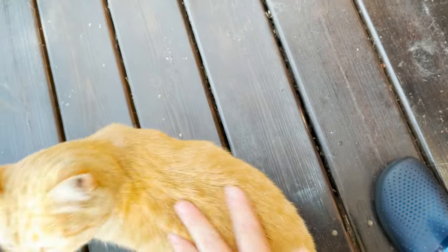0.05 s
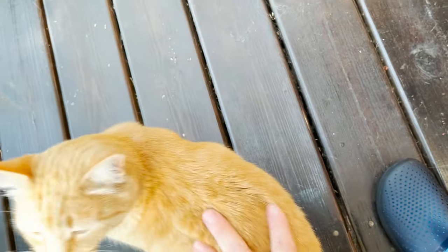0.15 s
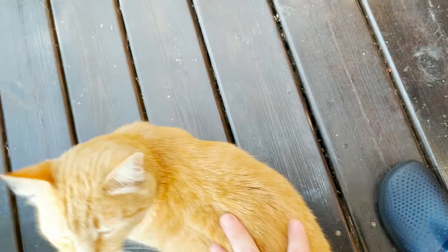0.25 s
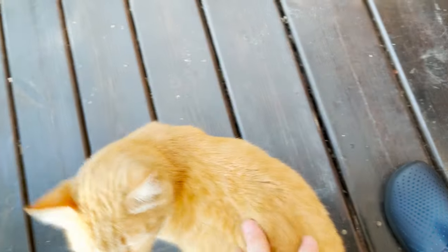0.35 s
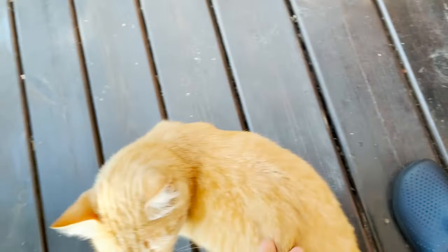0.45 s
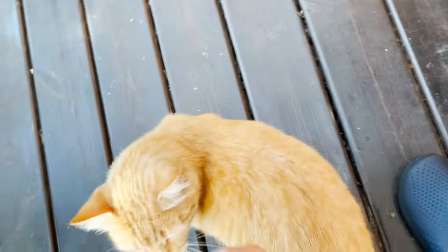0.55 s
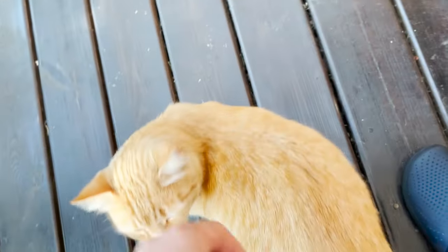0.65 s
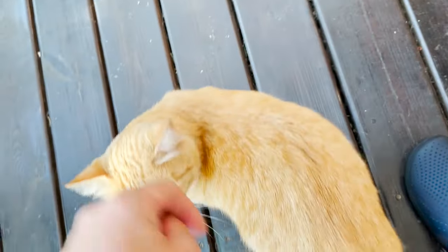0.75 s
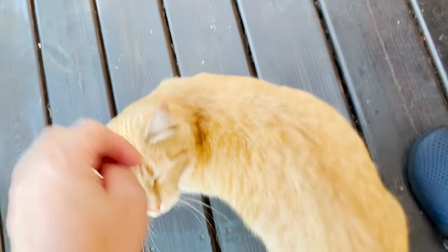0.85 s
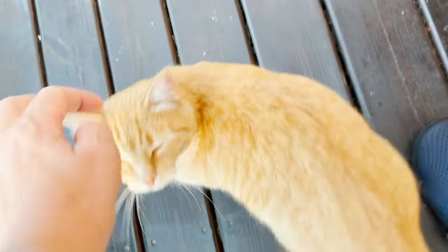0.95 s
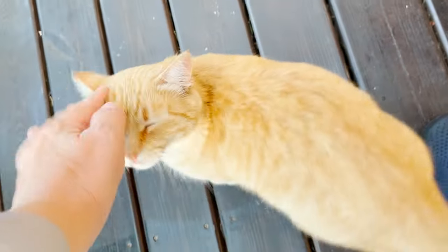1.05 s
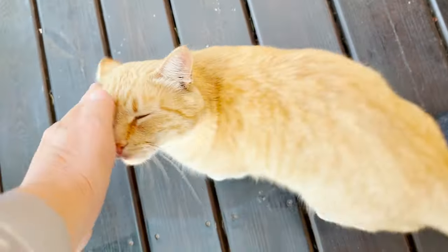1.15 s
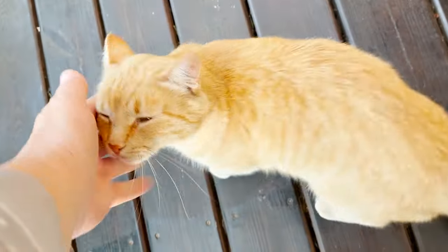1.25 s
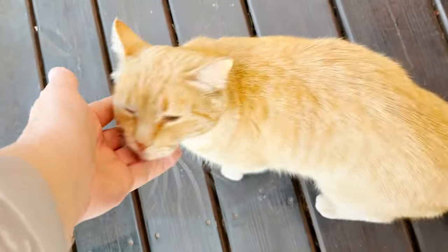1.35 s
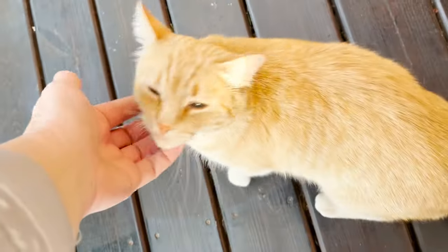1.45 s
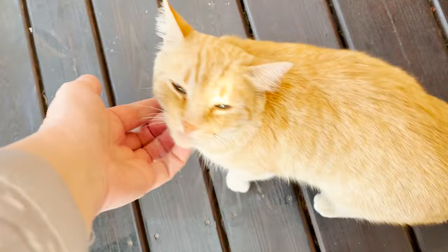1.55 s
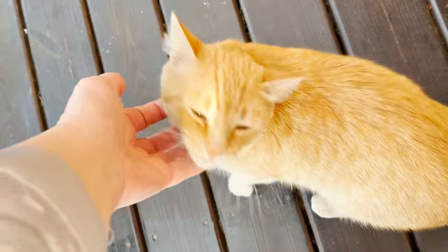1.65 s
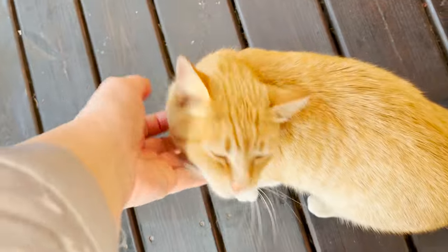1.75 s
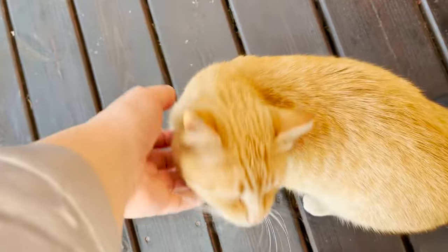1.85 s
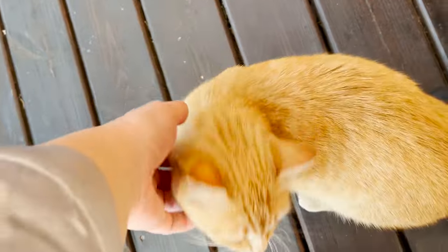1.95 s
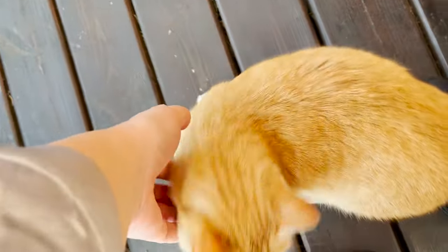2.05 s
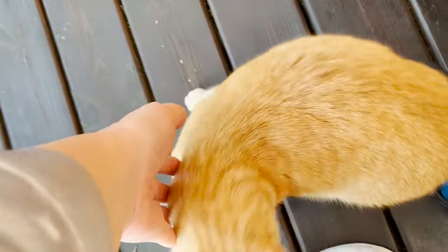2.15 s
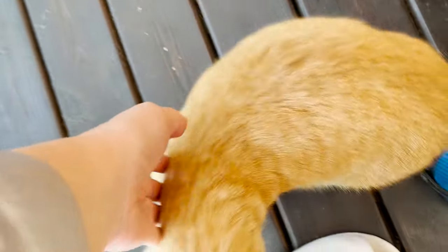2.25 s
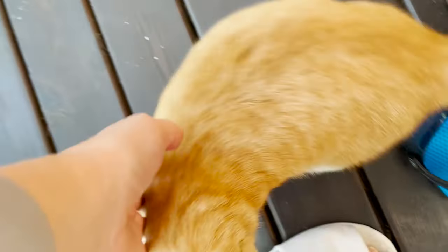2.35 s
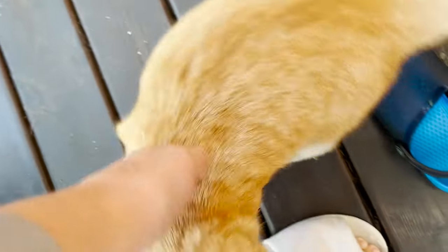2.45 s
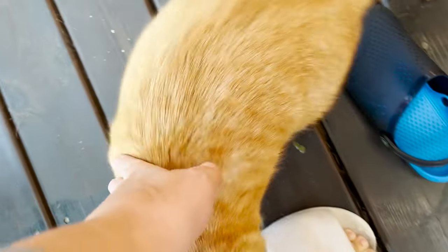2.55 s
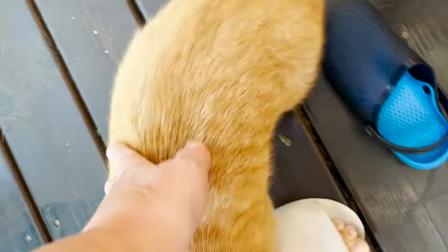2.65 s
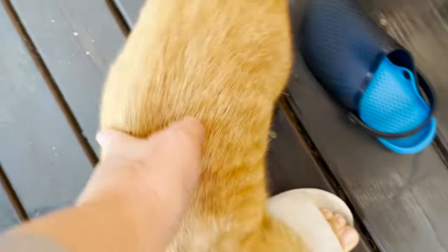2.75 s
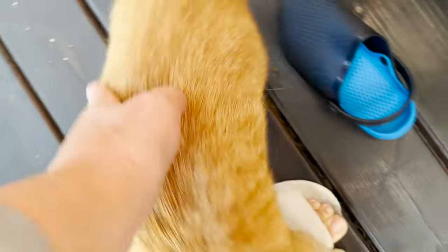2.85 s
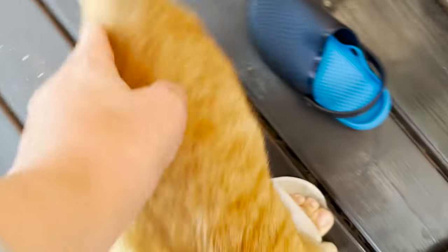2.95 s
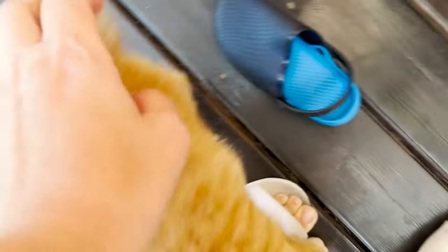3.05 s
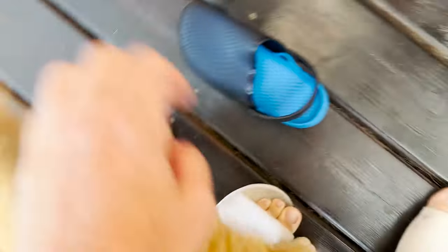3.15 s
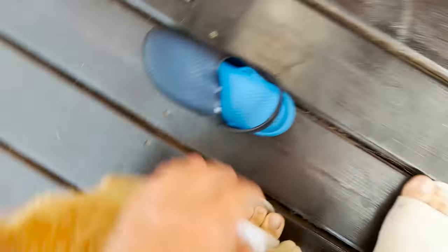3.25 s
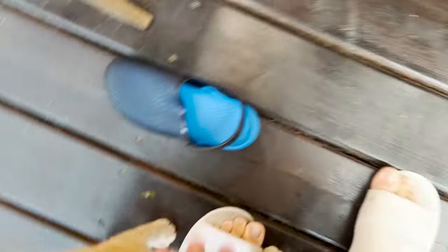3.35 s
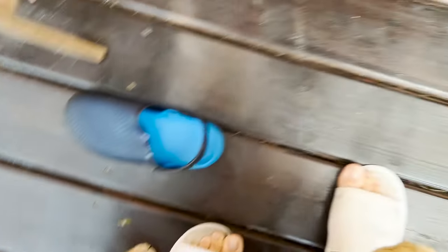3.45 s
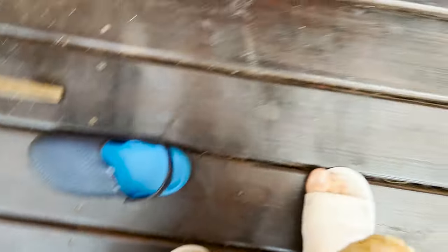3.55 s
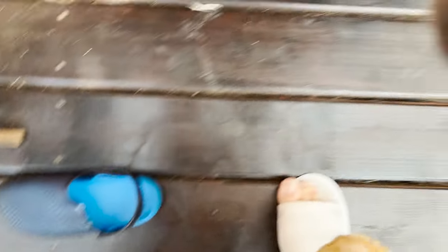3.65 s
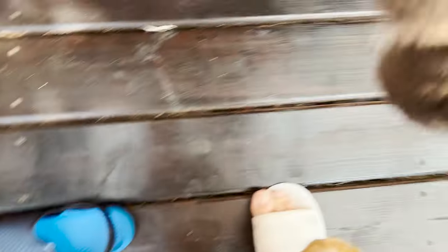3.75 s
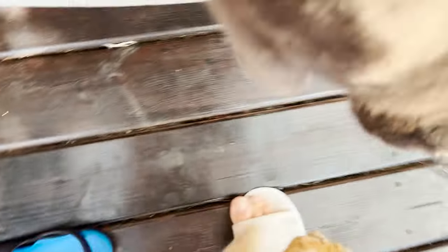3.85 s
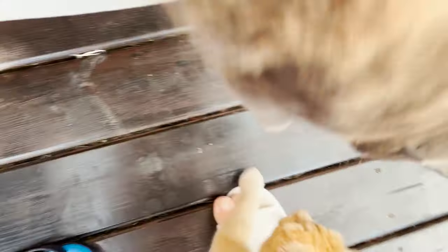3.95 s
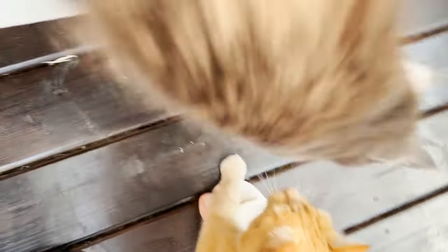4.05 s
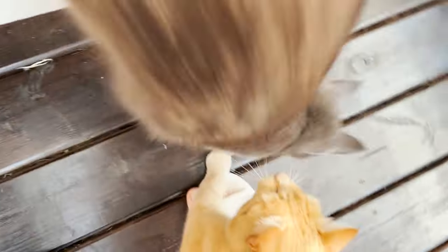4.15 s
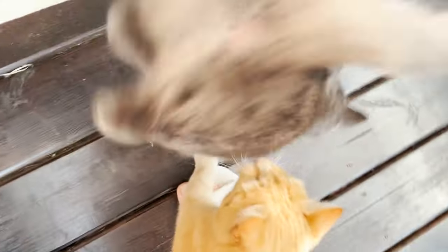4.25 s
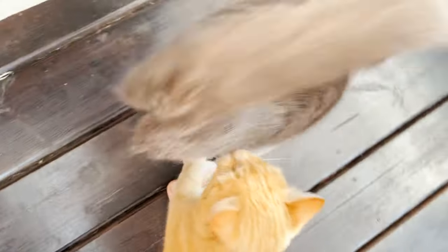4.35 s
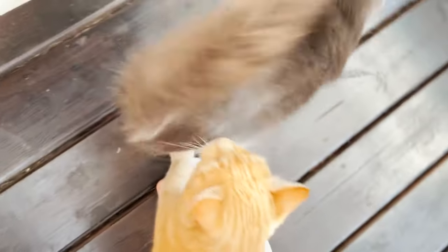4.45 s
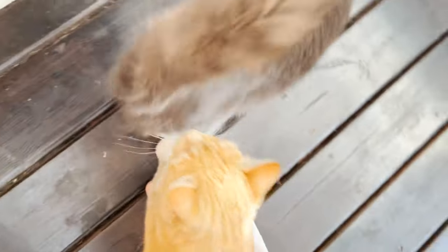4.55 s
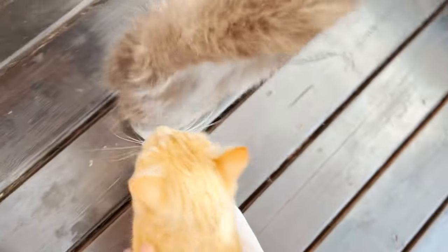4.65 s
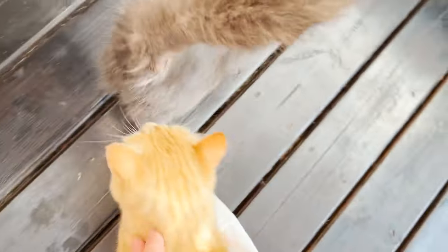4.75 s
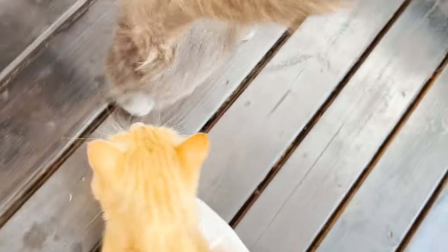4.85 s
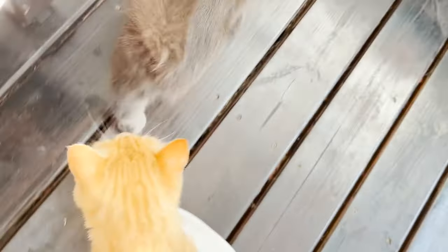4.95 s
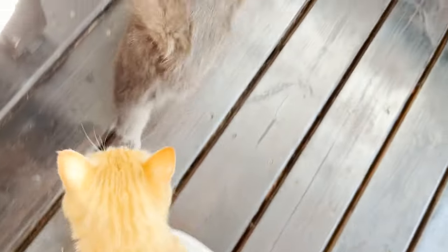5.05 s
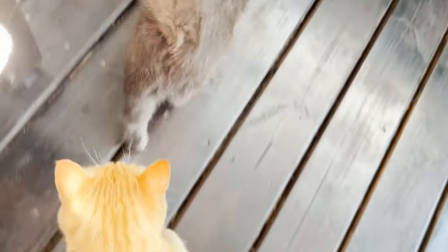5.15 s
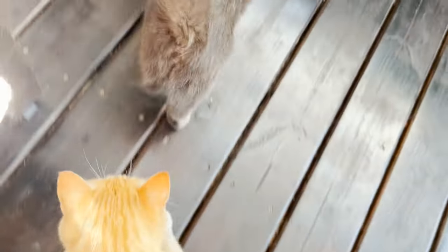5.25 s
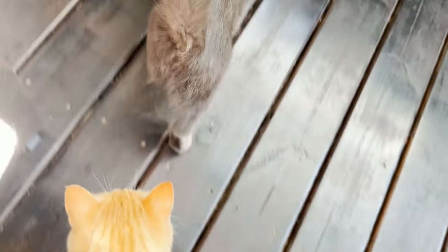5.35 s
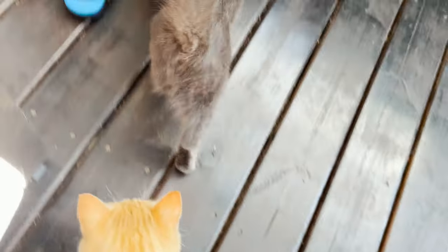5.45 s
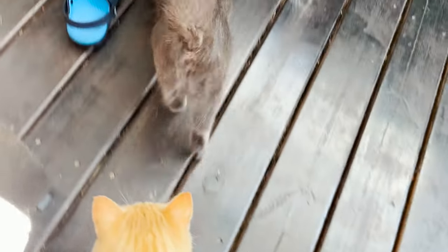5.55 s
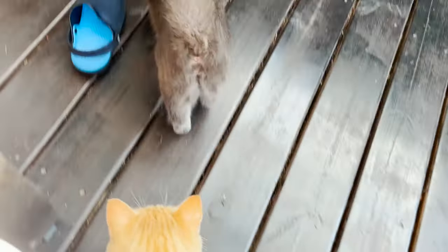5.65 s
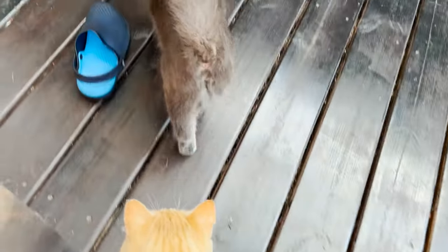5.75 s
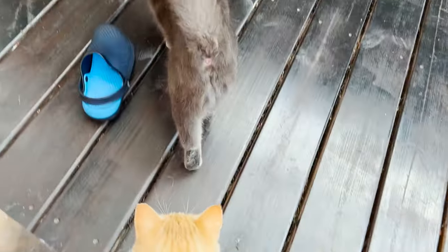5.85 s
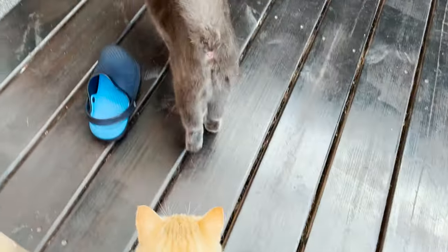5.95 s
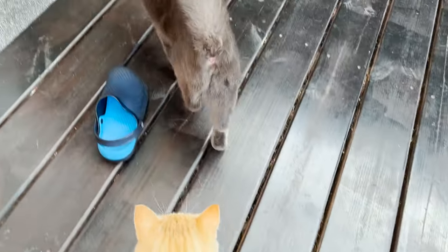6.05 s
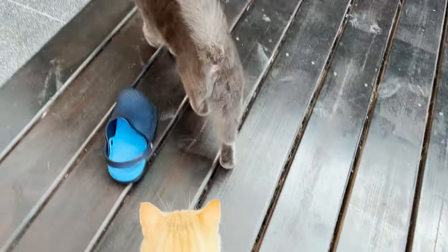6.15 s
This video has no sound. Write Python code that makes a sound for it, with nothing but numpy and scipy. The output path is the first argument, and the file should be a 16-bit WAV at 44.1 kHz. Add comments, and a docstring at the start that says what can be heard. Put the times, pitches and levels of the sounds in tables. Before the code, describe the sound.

A cat purrs close up in a low fluttering rumble and rattle while a hand rubs its fur, with a knock on deck boards midway.

```python
"""On a wooden terrace in the open air, a cat purrs up close while a hand strokes it.
Its larynx flaps 26 to 32 times a second, ringing chest and throat and puffing air through the nose.
The purr swells and fades, turning to a rattle when the mouth parts: each flap is a click or puff in a cavity.
Fur and sleeve rub as shaped noise and tick; slipping chirps scuff and ringing modes knock on the boards.
Low thuds, a wavering sine drone and a soft wash of coloured noise lie under it all."""
import sys
import numpy as np
from scipy import signal
from scipy.fft import rfft, irfft, next_fast_len
from scipy.io import wavfile
from scipy.ndimage import uniform_filter1d

SR = 44100
rng = np.random.default_rng(int(sys.argv[2]) if len(sys.argv) > 2 else 0)


def output_pcm(signal):
    """Save a mono or channel-first signal as 16-bit PCM at the path in sys.argv[1].

    Samples are clipped to [-1, 1] before scaling.
    """
    pcm = np.clip(np.atleast_2d(signal).T, -1, 1) * 32767
    wavfile.write(sys.argv[1], SR, np.round(pcm).astype(np.int16))


N = 273854
T = np.arange(N) / SR
SIZE = next_fast_len(N + SR // 4, True)  # padded length of the transforms
HZ = np.fft.rfftfreq(SIZE, 1 / SR)


def amp(db):
    """Decibels to gain."""
    return 10 ** (np.asarray(db) / 20)


def unit(x):
    """Scales to rms 1; for a pair of channels, the rms of their mean."""
    return x / np.sqrt(np.mean(np.atleast_2d(x).mean(0) ** 2) + 1e-24)


def read(points):
    """A table over frequency, joined on a log axis."""
    hz, value = np.transpose(points)
    return np.interp(np.log(HZ + 1), np.log(hz + 1), value)


def curve(points):
    """A table over time, joined by straight lines."""
    return np.interp(T, *np.transpose(points))


def level(rows, axis=1):
    """Gain over time from one dB column, silent outside the table."""
    rows = np.asarray(rows)
    return amp(np.interp(T, rows[:, 0], rows[:, axis], left=-200, right=-200))


def swells(rows, axis, flat=2.0, rest_db=-200):
    """Gain from events that rise to a crest and fall, 10 dB per rise or fall time; a larger flat holds longer."""
    t = T[::64]
    power = np.full(len(t), amp(rest_db) ** 2)
    for row in rows:
        crest, rise, fall = row[:3]
        away = np.maximum((crest - t) / rise, (t - crest) / fall)
        power += amp(row[axis] - 10 * abs(away) ** flat) ** 2
    return np.interp(T, t, np.sqrt(power))


def filtered(x, response):
    """Applies a frequency response."""
    return irfft(rfft(x, SIZE) * response, SIZE)[..., :N]


def cavity(modes):
    """Response of resonances, each applied three times for steep skirts."""
    response = 0
    for hz, width, db in modes:
        damping = 1j * HZ * width
        response = response + amp(db) * (damping / (hz ** 2 - HZ ** 2 + damping)) ** 3
    return response


def noise():
    """White noise."""
    return rng.standard_normal(N)


def wobble(per_s):
    """Random wavering of rms 1: noise kept below about this many hertz."""
    return unit(filtered(noise(), np.exp(-(HZ / per_s) ** 2)))


def wavering_tone(turn, width_hz):
    """A narrow band of noise around a gliding pitch, given as its phase in radians."""
    return wobble(width_hz) * np.cos(turn) + wobble(width_hz) * np.sin(turn)


def add(mix, s, sound):
    """Mixes a sound in at a time."""
    part = mix[max(round(s * SR), 0):][:len(sound)]
    part += sound[:len(part)]


# The two microphone ports. Each row: frequency in Hz, lead of the left port in radians.
PORT_PHASE = [(20, 0), (300, .04), (900, .15), (2500, .6), (4600, .7), (5700, -.8), (7000, -1.5),
              (8500, -3.1), (9800, -4.5), (11500, -6.1), (13000, -6.5), (15000, -9)]


def direct():
    """Response of both ports to sound that comes straight from the source."""
    return np.array([np.ones(len(HZ)), np.exp(-1j * read(PORT_PHASE))])


# Scattered sound. Each row: frequency in Hz, level in dB before sharing with the direct sound.
SCATTER = [(50, -24.5), (140, -19), (300, -10.5), (1000, 2), (2200, 15), (4500, 2), (7000, -2.5),
           (8000, -49), (9000, -36), (12000, -10)]


def microphone(scatter_s=0.0052):
    """Response of both ports to one source: direct sound and scatter from the boards."""
    t = T[:4096]
    taps = rng.standard_normal((2, len(t))) * np.exp(-t / scatter_s) * (t > .001)
    taps /= np.linalg.norm(taps, axis=1, keepdims=True)
    scatter = amp(read(SCATTER))
    return (direct() + scatter * rfft(taps, SIZE)) / np.sqrt(1 + scatter ** 2 / 2)  # scatter takes from the direct


def band_noise(spectrum, lo_hz, hi_hz):
    """Coloured noise of a moving source, scattered differently to each port; its part in the band has rms 1."""
    scatter = amp(read(SCATTER))
    colour = amp(read(spectrum)) / np.sqrt(1 + scatter ** 2 / 2)
    straight = filtered(noise(), colour * direct())
    pair = straight + filtered(np.array([noise(), noise()]), colour * scatter)
    return pair / np.std(filtered(pair.mean(0), (HZ > lo_hz) & (HZ < hi_hz)))


# Colour of still outdoor air. Each row: frequency in Hz, relative level in dB per Hz.
AIR = [(20, -2), (32, 0.5), (45, -1), (75, 13), (130, -5), (250, -10), (600, -11), (1200, -19), (2000, -36),
       (5500, -38.5), (8500, -51.5), (11500, -48.5), (15000, -78)]
AIR_DB = -60.5


def air(apart=0.81):
    """A soft outdoor wash, partly different at the two ports."""
    wash = noise() + apart * np.array([noise(), noise()])
    return amp(AIR_DB) * unit(filtered(wash, amp(read(AIR))))


# The wavering drone. Each row: time in seconds, level in dB before trim.
DRONE = [(0, -53), (.15, -54), (.40, -45.5), (.46, -51.5), (.52, -65), (.59, -52), (.95, -50), (1.13, -55),
         (1.35, -48.5), (2.05, -51), (2.27, -55.5), (2.58, -61), (2.71, -47), (3.12, -48.5), (3.22, -54.5),
         (3.44, -51.5), (3.86, -49), (4.35, -46), (4.68, -50), (4.79, -57), (5.42, -57), (5.57, -46.5),
         (5.80, -57.5), (6.21, -58)]
DRONE_HZ = 53.5
# Its octave hums through for a while. Each row: crest, rise and fall in seconds, level in dB.
OCTAVE = [(2.45, 0.83, 0.36, -58)]


def drone(drone_db=-2.5, octave_db=-17, waver=0.017):
    """A low tone that wavers in pitch and level, with a faint octave."""
    phase = 2 * np.pi * np.cumsum(DRONE_HZ * (1 + waver * wobble(23.7))) / SR
    low = amp(drone_db + 1.6 * wobble(12)) * level(DRONE)
    octave = amp(octave_db) * low + swells(OCTAVE, axis=3, flat=1.8)
    return np.sqrt(2) * (low * np.sin(phase) + octave * np.sin(2 * phase))


# Dull thuds of weight shifting. Each row: crest, rise and fall in seconds, pitch in Hz, level in dB.
THUDS = [(1.311, 0.05, 0.077, 121, -44), (3.67, 0.034, 0.024, 59, -42.5), (5.187, 0.05, 0.073, 53.4, -33.5)]


def thuds():
    """The deck booms softly, each thud a sine at one low pitch."""
    out = np.zeros(N)
    for row in THUDS:
        tone = np.sqrt(2) * np.sin(2 * np.pi * row[3] * (T - row[0]))
        out += swells([row], axis=4, flat=1.37) * tone
    return out


# Knocks on the boards. Each row: start in seconds, level in dB, contact time in seconds, scrape level in dB.
KNOCKS = [(4.147, -31, 0.001, -40), (4.160, -18, 0.00056, -43.5), (4.17, -24, 0.00038, -64.5),
          (4.187, -21, 0.0018, -58.5), (4.209, -15.5, 0.0035, -60.5)]
# Modes of the board. Each row: frequency in Hz, level in dB, time to fall by 60 dB in seconds.
BOARD = [(179, -19.5, 0.37), (253, -11.5, 0.18), (280.4, 1, 0.17), (332, -21, 0.055), (403, -28.5, 0.021),
         (657, -20, 0.035), (834, -17.5, 0.089), (1110, -22.5, 0.044), (1260, -45, 0.043)]
# Colour of the scrape. Each row: frequency in Hz, relative level in dB per Hz.
SCRAPE = [(200, 18.5), (700, 23.5), (1300, -3), (2700, 1.5), (4000, -20), (6200, -2.5), (9000, -16),
          (14000, -3.5)]


def knocks(scrape_s=0.019, lowest_hz=150):
    """Each blow rings the board and scrapes; a longer contact leaves out the high modes."""
    t = T[:SR // 2]
    ring = sum(amp(db - 60 * t / t60) * np.sin(2 * np.pi * hz * t) for hz, db, t60 in BOARD)
    # the ring keeps little bass below its lowest mode
    ring = signal.lfilter(*signal.butter(2, lowest_hz, "high", fs=SR), ring)
    blows, grit = np.zeros(N), np.zeros(N)
    for s, db, contact_s, scrape_db in KNOCKS:
        push = np.exp(-(np.pi * (t - contact_s) / contact_s) ** 2)
        add(blows, s, amp(db) * push / push.sum())
        add(grit, s, amp(scrape_db) * np.exp(-t / scrape_s))
    scrape = grit * unit(filtered(noise(), amp(read(SCRAPE))))
    return signal.fftconvolve(blows, ring)[:N] + scrape


# Stick and slip. Each row, one slip: start in seconds, level in dB, pitch in Hz, rise in seconds.
SLIPS = [(3.905, -44.5, 639, 0.0071), (3.930, -37.5, 594, 0.0038), (3.941, -34.5, 643, 0.0022),
         (3.959, -35.5, 634, 0.0022), (3.97, -33, 635, 0.0033), (3.982, -38, 771, 0.0053),
         (4.002, -29, 545, 0.0032), (4.027, -27.5, 466, 0.0015), (4.035, -47, 388, 0.014),
         (4.071, -48.5, 607, 0.0034)]
# Partials of a slip. Each row: multiple of the pitch, width in Hz, level in dB.
SCUFF_RING = [(1, 40, 0), (1.95, 110, -11), (5.6, 220, -33)]
# The drag between slips. Each row: crest, rise and fall in seconds, level in dB.
DRAGS = [(3.925, 0.028, 0.02, -71), (3.982, 0.054, 0.027, -52.5)]
# Resonances of the drag. Each row: frequency in Hz, width of one pass in Hz, relative level in dB.
DRAG_RING = [(1230, 470, 0), (1600, 210, -4), (2570, 330, -12), (3100, 590, -18), (3570, 340, -9)]
# The squeak late in the scuff. Each row: time in seconds, pitch in Hz, level in dB.
SQUEAK = [(4.002, 700, -63), (4.012, 792, -36), (4.017, 820, -35), (4.027, 867, -48)]


def scuff():
    """Separate slips, each a short rough chirp, over a resonant drag; a rising squeak comes late."""
    out, t = np.zeros(N), T[:SR // 8]
    for s, db, hz, rise_s in SLIPS:
        steps = rng.standard_normal((len(SCUFF_RING), len(t)))
        drift = np.cumsum(uniform_filter1d(steps, size=64), axis=1)  # random phase broadens each partial
        ring = 0
        for (multiple, width, mode_db), walk in zip(SCUFF_RING, drift):
            phase = 2 * np.pi * hz * multiple * t + np.sqrt(2 * np.pi * width / SR) * walk
            ring = ring + amp(mode_db) * np.sin(phase)
        add(out, s, amp(db) * ring * t / rise_s * np.exp(1 - t / rise_s))
    s, hz, _ = np.transpose(SQUEAK)
    squeak = np.sqrt(2) * np.sin(2 * np.pi * np.cumsum(np.interp(T, s, hz)) / SR)
    drag = unit(filtered(noise(), cavity(DRAG_RING))) * swells(DRAGS, axis=3, flat=3.2)
    return out + drag + level(SQUEAK, axis=2) * squeak


# Claws and cloth. Each row: start in seconds, level before decay in dB, centre in Hz, decay in seconds.
TICKS = [(0.601, -54, 9850, 0.00095), (2.689, -62, 10200, 0.0018), (3.762, -49, 11460, 0.0055),
         (3.944, -38.5, 9000, 0.0011), (3.88, -43, 740, 0.0014), (4.026, -40, 4470, 0.00088),
         (4.281, -57, 1020, .0015), (5.935, -27.5, 5300, 0.001), (6.137, -24.5, 8720, 0.00099),
         (6.151, -30, 11000, 0.00066)]


def ticks(breadth=0.18):
    """Short snaps of band noise that die away at once."""
    out, t = np.zeros(N), T[:3000]
    for s, db, hz, decay_s in TICKS:
        edges = np.clip([hz * (1 - breadth), hz * (1 + breadth)], 100, 20000)
        band = signal.butter(2, edges, "band", fs=SR)
        snap = unit(signal.lfilter(*band, rng.standard_normal(len(t))))
        add(out, s, amp(db) * snap * np.exp(-t / decay_s))
    return out


# Two resonances of the hollow between hand and fur. Each row: time in seconds, lower and upper pitch in Hz.
HOLLOW = [(0.38, 2200, 2990), (1.05, 2623, 3929), (1.18, 2600, 4420), (1.279, 2780, 5150),
          (1.549, 2700, 5290), (1.9, 3300, 5570), (2.42, 2183, 3400), (2.601, 2503, 4010),
          (3.0, 2300, 4360), (3.3, 2400, 4600), (4.0, 2607, 3600), (4.161, 2850, 5550), (4.901, 4120, 5270),
          (5.399, 4540, 5920), (5.919, 2400, 5000), (6.2, 2800, 6370)]


def hollow_ring(mic, lower_width=360, upper_width=640, upper_db=-1):
    """Two bands of noise (widths in Hz) glide as the hollow under the hand changes shape."""
    s, lower_hz, upper_hz = np.transpose(HOLLOW)
    ring = 0
    for hz, width, gain in ((lower_hz, lower_width, 1), (upper_hz, upper_width, amp(upper_db))):
        turn = 2 * np.pi * np.cumsum(np.interp(T, s, hz)) / SR
        ring = ring + gain * unit(filtered(wavering_tone(turn, width), mic))
    return unit(ring)


# Strokes of the hand. Each row: crest, rise and fall in seconds, then levels in dB before trim:
# rub of skin on fur, fine swish of hair and sleeve, ring of the hollow under the hand.
STROKES = [(0.375, 0.05, 0.071, -83, -84, -85), (0.63, 0.045, 0.022, -100, -74.5, -100),
           (0.86, 0.033, 0.011, -111, -76, -100), (1.14, 0.087, 0.12, -93, -72, -74),
           (1.275, 0.17, 0.024, -77.5, -69.5, -69), (1.412, 0.0091, 0.01, -91, -71, -85),
           (1.55, 0.1, 0.048, -87.5, -66.5, -79), (1.89, 0.041, 0.046, -80, -73.5, -68),
           (2.14, 0.055, 0.42, -96, -86, -86), (2.47, 0.041, 0.064, -72, -64.5, -62.5),
           (2.60, 0.039, 0.03, -69, -55.5, -80), (2.70, 0.034, 0.068, -79.5, -77, -85),
           (3.04, 0.12, 0.081, -74.5, -68.5, -64.5), (3.33, 0.13, 0.13, -81, -88, -77.5),
           (3.47, 0.13, 0.023, -107, -73, -100), (3.60, 0.16, 0.32, -90.5, -86, -100),
           (3.77, 0.02, 0.04, -81.5, -63, -89), (3.96, 0.027, 0.066, -98, -61, -82.5),
           (4.035, 0.026, 0.056, -71.5, -77, -76), (4.16, 0.016, 0.045, -66.5, -68.5, -74),
           (4.41, 0.076, 0.11, -87, -69.5, -92), (5.03, 0.12, 0.12, -79, -83, -71),
           (5.33, 0.1, 0.28, -86.5, -101, -88), (5.64, 0.17, 0.14, -84.5, -90.5, -93),
           (5.92, 0.03, 0.11, -73, -47, -82), (6.04, 0.084, 0.048, -83, -59, -92),
           (6.143, 0.023, 0.038, -96, -52, -98), (6.20, 0.062, 0.046, -90, -55, -94)]
# Colour of the full rub. Each row: frequency in Hz, relative level in dB per Hz.
RUB = [(300, -15), (1200, 7), (1850, 16.5), (2500, 18), (3400, 18), (5200, 7.5), (6800, -11.5),
       (8500, -32.5), (12000, -19)]
# A light touch only whispers. Each row: frequency in Hz, relative level in dB per Hz.
WHISPER = [(1500, 4), (3200, -10.5), (4500, -4.5), (5700, -8.5), (6500, -7), (8500, -34), (12000, -42)]
# Colour of the brisk swish. Each row: frequency in Hz, relative level in dB per Hz.
SWISH = [(2000, -19.5), (5000, -2.5), (7000, 4), (9000, -3.5), (11300, 4), (12500, -7.5), (14500, -3),
         (16000, -34)]
# Single hairs under a slow hand only fizz. Each row: frequency in Hz, relative level in dB per Hz.
FIZZ = [(2000, -20.5), (5000, -8.5), (7000, -7.5), (9000, -1), (11000, 1), (12500, -4), (14000, -4.5),
        (16000, -34.5)]


def stroking(mic, rub_db=-3.0, swish_db=-5.0, grain_db=1.5, patchy_db=1.8, firm_db=-76, brisk_db=-62):
    """Hairs slip in tiny clumps and ring the hollow; a brisk, swishing stroke sounds fuller than a light one."""
    clumps = unit(amp(grain_db * wobble(540) + patchy_db * wobble(29)))
    force = swells(STROKES, axis=3, flat=1.3)
    speed = swells(STROKES, axis=4, flat=1.22)
    # shares of power, from 0 for a light or slow hand to 1
    firm, brisk = (speed ** 2 / (speed ** 2 + amp(db) ** 2) for db in (firm_db, brisk_db))
    full, light = band_noise(RUB, 4500, 5700), band_noise(WHISPER, 4500, 5700)
    rub = force * (np.sqrt(firm) * full + np.sqrt(1 - firm) * light)
    rub = rub + swells(STROKES, axis=5, flat=1.2) * hollow_ring(mic)
    fast, slow = band_noise(SWISH, 9500, 14000), band_noise(FIZZ, 9500, 14000)
    swish = speed * (np.sqrt(brisk) * fast + np.sqrt(1 - brisk) * slow)
    return clumps * (amp(rub_db) * rub + amp(swish_db) * swish)


# Runs of the purr. Each row: first flap in seconds, end in seconds, flaps per second.
RUNS = [(0.000, 0.50, 30.5), (0.547, 1.10, 32.3), (1.1805, 2.45, 30.0), (2.631, 3.20, 30.8),
        (3.297, 4.10, 28.7), (4.319, 4.70, 27.4), (4.738, 5.09, 27.2), (5.116, 5.52, 26.0),
        (5.591, 5.82, 25.7), (5.910, 6.21, 27.3)]
# A flap may bounce and close again. Each row: time in seconds, size of the rebound in dB, its lag in seconds.
REBOUND = [(0, -13, .01), (.13, -15, .009), (.165, -5, .009), (.2, -1, .011), (.23, -10, .01),
           (.29, -16, .011), (1.2, -14, .009), (1.42, -14, .009), (1.5, -3, .009), (1.58, -3, .011),
           (1.61, -16, .01), (1.84, -18, .01), (1.88, -5, .008), (1.91, -20, .012), (3.3, -14, .02),
           (3.5, -5, .022), (3.7, -12, .02), (4.58, -1, .014), (4.8, -12, .014), (5.9, -8, .021),
           (6.2, -2, .021)]


def larynx(jitter_s, uneven_db, lag_spread):
    """One click for each flap and one for its rebound, slightly uneven in time and size."""
    s = np.concatenate([np.arange(start, end, 1 / rate) for start, end, rate in RUNS])
    late, size, slow, bounce = rng.standard_normal((400, 4))[:len(s)].T
    when, rebound_db, lag_s = np.transpose(REBOUND)
    first = s + jitter_s * late
    second = first + np.interp(s, when, lag_s) * (1 + lag_spread * slow)
    flaps, rebounds = np.zeros((2, N))
    flaps[np.clip(first * SR, 0, N - 1).astype(int)] = amp(uneven_db * size)
    rebound_size = amp(np.interp(s, when, rebound_db) + uneven_db * bounce)
    rebounds[np.clip(second * SR, 0, N - 1).astype(int)] = rebound_size
    return flaps, rebounds


def puffs(clicks, puff_s):
    """Each click opens a bell-shaped gate for the air."""
    return unit(filtered(clicks, np.exp(-(np.pi * HZ * puff_s) ** 2)))


def steadied(x, window_s=0.053):
    """Evens out the power over a couple of flaps, so that puffs carry about the same energy."""
    size = int(window_s * SR)
    power = uniform_filter1d(uniform_filter1d(np.mean(x ** 2, axis=0), size), size)
    return unit(x / np.sqrt(abs(power) + 0.0097 * power.mean()))


def flapping(clicks, modes, mic, rough, puff_s, leak, delay_s, wander_hz=0., glide=None):
    """Each flap is a snap and a puff of air into a cavity; some air leaks between flaps."""
    gate = puffs(clicks, puff_s)
    rough = np.clip(rough, 0, 1)
    drive = (1 - rough) * unit(clicks) + rough * unit((gate + leak) * noise())
    response = mic * cavity(modes) * np.exp(-2j * np.pi * HZ * delay_s)
    ring = filtered(drive, response)
    if wander_hz:  # the resonance wanders from puff to puff, and follows any glide
        shift_hz = wander_hz * wobble(22.92) + (curve(glide) - modes[0][0] if glide else 0)
        turn = 2 * np.pi * np.cumsum(shift_hz) / SR
        ring = ring * np.cos(turn) + filtered(drive, 1j * response) * np.sin(turn)
    return steadied(ring)


def chirping(clicks, glide, mic, puff_s, rough, fuzz_hz, leak, lift_hz=0.):
    """Each puff sounds one resonance as a short bell-shaped tone, whose pitch may bend while the larynx is shut."""
    gate = puffs(clicks, puff_s)
    shut = np.zeros(N)
    for start, end, rate in RUNS:
        shut += np.sin(np.pi * rate * (T - start)) ** 4 * (T >= start) * (T < end)  # peaks between flaps
    pitch_hz = curve(glide) + lift_hz * shut + .025 * curve(glide) * wobble(25)
    turn = 2 * np.pi * np.cumsum(pitch_hz) / SR
    tone = np.cos(turn) + rough * wavering_tone(turn, fuzz_hz)
    return steadied(filtered((gate + leak) * tone, mic))


# Resonances of the chest. Each row: frequency in Hz, width of one pass in Hz, relative level in dB.
CHEST = [(162.5, 78.6, 4.5), (135.7, 38, -9.5), (262.8, 68, -9)]
# Resonances of the windpipe. Each row: frequency in Hz, width of one pass in Hz, relative level in dB.
WINDPIPE = [(400, 300, 0), (720, 600, -18)]
# The cat pushes harder and its body rumbles. Each row: crest, rise and fall in seconds,
# chest and windpipe level in dB before trim.
SURGES = [(0.21, 0.33, 0.2, -68.5, -59.5), (0.74, 0.097, 0.051, -48.5, -65.5),
          (0.98, 0.17, 0.091, -48, -71), (1.222, 0.022, 0.024, -34, -36.5), (1.29, 0.033, 0.022, -36, -36),
          (1.50, 0.14, 0.28, -45.5, -54.5), (1.91, .07, 0.2, -50.5, -65), (2.17, 0.028, 0.23, -51, -79),
          (2.78, 0.12, 0.041, -51, -62), (3.05, 0.18, 0.18, -48.5, -65.5), (3.42, 0.032, 0.097, -30, -44.5),
          (3.51, 0.06, 0.095, -33, -40.5), (3.63, 0.061, 0.38, -45.5, -48.5),
          (4.33, 0.093, 0.18, -59.5, -82), (4.58, .07, 0.061, -41.5, -45.5),
          (4.89, 0.15, 0.098, -50.5, -67), (5.23, 0.11, 0.1, -45, -52.5),
          (5.32, 0.039, 0.044, -37.5, -59.5), (6.07, .13, 0.15, -36.5, -83), (6.20, 0.033, 0.016, -46, -52)]
# Air rushes through the windpipe and blurs the flaps. Each row: crest, rise and fall in seconds, level in dB.
RUSHES = [(0.96, 0.14, 0.09, -58.5), (2.97, 0.14, 0.071, -70), (4.89, 0.13, 0.093, -75)]
REST_CHEST_DB, REST_WINDPIPE_DB = -66, -102  # quiet purr between swells, before trim


def trunk(clicks, doubled, mic):
    """Flaps ring the chest and windpipe, and rushing air blurs them."""
    chest = flapping(clicks, CHEST, mic, rough=0.82, puff_s=0.004, leak=0.56, delay_s=0.0017)
    windpipe = flapping(doubled, WINDPIPE, mic, rough=.45, puff_s=.002, leak=.5, delay_s=-.002)
    rush = flapping(clicks, WINDPIPE, mic, rough=1.0, puff_s=.01, leak=3, delay_s=-.002)
    return (amp(-5.0) * chest * swells(SURGES, axis=3, flat=1.23, rest_db=REST_CHEST_DB)
            + amp(-9.0) * windpipe * swells(SURGES, axis=4, flat=1.43, rest_db=REST_WINDPIPE_DB)
            + rush * swells(RUSHES, axis=3, flat=3.5))


# Air hisses through the nose and rasps in the throat. Each row: crest, rise and fall in seconds,
# then levels in dB before trim: nose, rasp, ring of the nostril.
HISSES = [(0.2, 0.068, 0.15, -78, -61.5, -63), (0.29, 0.089, 0.072, -88, -56.5, -84),
          (0.98, 0.11, 0.08, -86.5, -67, -77), (1.28, 0.07, 0.065, -102, -65, -99),
          (1.88, 0.22, 0.23, -85.5, -94, -78), (2.665, 0.014, 0.012, -69, -82, -58.5),
          (2.73, 0.064, 0.082, -70.5, -79, -74), (2.87, 0.1, 0.13, -67.5, -77, -62),
          (2.98, 0.1, 0.1, -70.5, -67, -64), (3.12, 0.036, 0.048, -64.5, -90, -62),
          (4.39, 0.054, 0.037, -77.5, -75.5, -72), (4.54, 0.06, 0.015, -100, -69.5, -100),
          (4.80, 0.05, 0.11, -64.5, -74.5, -59.5), (4.93, 0.13, 0.1, -65.5, -89, -61.5),
          (5.0, 0.065, 0.05, -86, -74, -69), (5.068, 0.03, 0.032, -84, -65.5, -61),
          (5.65, 0.065, .09, -68.5, -100, -69.5), (5.77, 0.048, 0.071, -84, -100, -80)]
# The throat resonance glides as jaw and head move. Each row: time in seconds, pitch in Hz.
THROAT_GLIDE = [(0.1, 616.3), (0.369, 609), (1.3, 572.4), (1.95, 644.4), (2.15, 676), (3.0, 660),
                (3.5, 661.6), (4.58, 603.3), (6.1, 631.3)]
# Resonance of the pharynx. Each row: frequency in Hz, width of one pass in Hz, relative level in dB.
PHARYNX = [(1314, 230, 1)]
# Its glide. Each row: time in seconds, pitch in Hz.
PHARYNX_GLIDE = [(0.3, 1436), (0.9, 1336), (4.85, 1276), (4.97, 1630), (5.07, 1730)]


def throat(clicks, doubled, mic, voicing):
    """Puffs sound the throat as a tone, and air rasps in the pharynx."""
    tone = chirping(doubled, THROAT_GLIDE, mic, puff_s=.0042, rough=.38, fuzz_hz=130, leak=.2, lift_hz=-20)
    rasp = flapping(clicks, PHARYNX, mic, rough=1.0, puff_s=.006, leak=2.5, delay_s=-.0014,
                    wander_hz=50, glide=PHARYNX_GLIDE)
    rasp = rasp * swells(HISSES, axis=4, flat=3.2)
    return amp([[-1.2], [1.8]]) * tone * voicing + amp([[1.5], [-.5]]) * rasp  # left, right in dB


# Resonances of the nose. Each row: frequency in Hz, width of one pass in Hz, relative level in dB.
NOSE = [(2685, 970, -1.5), (3683, 1000, 6.5), (6320, 380, 5.5), (7160, 790, 3.5)]
# The nostril's ring glides as the head moves. Each row: time in seconds, pitch in Hz.
NOSTRIL_GLIDE = [(0.302, 3548), (1.901, 3574), (2.66, 3760), (2.76, 3606), (2.918, 3600), (3.099, 3850),
                 (4.399, 3390), (4.76, 3620), (4.922, 3420), (5.09, 3480), (5.63, 3400), (5.8, 3480)]


def nose(clicks, mic):
    """Each flap puffs air through the nose, whose cavities hiss and whose nostril rings."""
    hiss = flapping(clicks, NOSE, mic, rough=.95, puff_s=.006, leak=1.1, delay_s=-.001, wander_hz=120)
    nostril = chirping(clicks, NOSTRIL_GLIDE, mic, puff_s=.0055, rough=2.5, fuzz_hz=290, leak=.55)
    nasal = hiss * swells(HISSES, axis=3, flat=2.4) + nostril * swells(HISSES, axis=5, flat=2.4)
    uneven = amp(1.2 * wobble(17))
    return amp([[1.5], [0.]]) * uneven * nasal  # left, right in dB


# The mouth resonance glides as the jaw moves. Each row: time in seconds, pitch in Hz.
MOUTH_GLIDE = [(0.021, 1072), (0.06, 998), (0.105, 1080), (0.168, 1004), (0.28, 1040), (0.37, 1130),
               (1.251, 1093), (1.551, 1047), (1.9, 1134), (6.2, 1087)]
# Upper resonances of the open mouth. Each row: frequency in Hz, width of one pass in Hz, relative level in dB.
LIPS = [(2136, 620, 0), (3514, 570, 0.5), (6370, 990, -15.5), (7600, 290, -7), (9020, 1170, 0.5),
        (11400, 2100, -17)]


def mouth(clicks, doubled, mic, opening, lips_db=-22, forced_db=-43):
    """Crisp puffs in a gentle purr give way to longer ones forced past open lips; returns tone and lip hiss."""
    crisp = chirping(doubled, MOUTH_GLIDE, mic, puff_s=.0021, rough=.3, fuzz_hz=200, leak=.13)
    forced = chirping(doubled, MOUTH_GLIDE, mic, puff_s=.0054, rough=.24, fuzz_hz=190, leak=.14, lift_hz=110)
    lips = flapping(clicks, LIPS, mic, rough=1.0, puff_s=0.013, leak=1.0, delay_s=-0.000995)
    effort = opening ** 2 / (opening ** 2 + amp(forced_db) ** 2)
    tone = ((1 - effort) * crisp + effort * forced) * opening
    hiss = amp(lips_db) * lips * np.sqrt(effort) * np.minimum(opening, amp(forced_db))
    return tone, hiss


# The wet snap of each flap. Each row: frequency in Hz, width of one pass in Hz, relative level in dB.
SNAP = [(1250, 480, 7.5), (1940, 1800, -9.5), (3440, 390, -5), (7100, 2500, -16)]


def wet_snap(clicks, mic, opening, voicing, snap_db=-73):
    """Each flap snaps wetly, heard as soon as the mouth parts."""
    snap = flapping(clicks, SNAP, mic, rough=.9, puff_s=.002, leak=.1, delay_s=-.001)
    return amp(snap_db) * snap * np.tanh(opening / amp(-57) + voicing / amp(-40))


# Throat and lips open and the purr turns into a rattle. Each row: crest, rise and fall in seconds,
# throat level in dB before trim, mouth level in dB.
RATTLES = [(0.015, 0.027, 0.063, -48, -49), (0.11, 0.066, 0.09, -54.5, -37.5),
           (0.18, 0.051, 0.024, -43, -42), (0.26, 0.084, 0.09, -49.5, -36.5),
           (0.355, 0.017, 0.036, -52.5, -44.5), (0.62, 0.07, 0.11, -64.5, -75.5),
           (1.235, 0.05, 0.059, -72, -53), (1.32, 0.049, 0.054, -49, -50.5),
           (1.43, 0.076, 0.11, -85, -54.5), (1.65, 0.081, 0.1, -69.5, -54), (1.885, 0.088, 0.078, -68, -52),
           (2.01, 0.08, 0.067, -44.5, -81), (2.12, 0.039, 0.048, -53.5, -63.5),
           (2.19, 0.061, 0.12, -62.5, -71), (2.57, 0.022, 0.049, -74, -63),
           (2.97, 0.055, 0.057, -58.5, -71), (3.46, 0.053, 0.078, -44.5, -85),
           (4.58, 0.062, 0.066, -57, -75), (6.03, 0.1, 0.14, -56.5, -81), (6.19, 0.095, 0.092, -81, -59.5)]
REST_THROAT_DB, REST_MOUTH_DB = -75.5, -85.5  # quiet purr between swells, throat before trim


def purr(mic, muffle_hz=1850):
    """The same flaps ring every cavity; body, throat and mouth tones are muffled, hiss and snaps stay bright."""
    clicks, rebounds = larynx(jitter_s=.0006, uneven_db=1.2, lag_spread=.15)
    doubled = clicks + rebounds
    opening = swells(RATTLES, axis=4, flat=3.54, rest_db=REST_MOUTH_DB)
    voicing = swells(RATTLES, axis=3, flat=2.05, rest_db=REST_THROAT_DB)
    mouth_tone, lip_hiss = mouth(clicks, doubled, mic, opening)
    body = trunk(clicks, doubled, mic) + throat(clicks, doubled, mic, voicing) + mouth_tone
    muffled = filtered(body, 1 / (1 + (HZ / muffle_hz) ** 14))
    return muffled + nose(clicks, mic) + lip_hiss + wet_snap(clicks, mic, opening, voicing)


def scene():
    """Cat, hand and deck in the open air."""
    cat, hand = microphone(), microphone()
    deck = filtered(drone() + thuds() + knocks() + scuff(), cat)
    touch = filtered(ticks(), hand) + stroking(hand)
    return air() + deck + touch + purr(cat)


EDGE_HZ = 15700


def record(dry, treble_hz=13600):
    """The microphone dulls the highest treble and favours the left port a little; then the band limit."""
    heard = filtered(dry * amp([[.4], [-.4]]), 1 / (1 + (HZ / treble_hz) ** 20))
    lowpass = signal.firwin(511, EDGE_HZ, window=("kaiser", 9), fs=SR)
    return signal.oaconvolve(heard, lowpass[None], "same", axes=1)


dry = scene()
out = record(dry)
output_pcm(out)
```